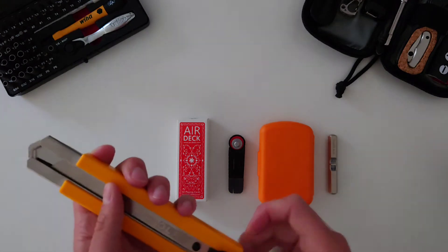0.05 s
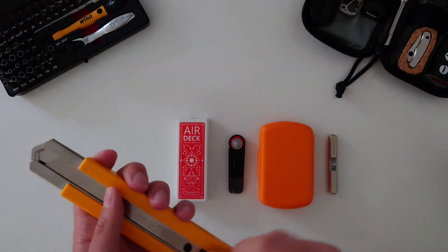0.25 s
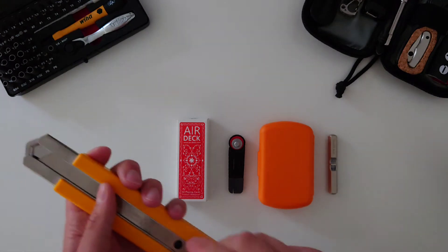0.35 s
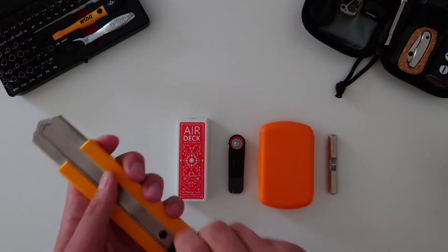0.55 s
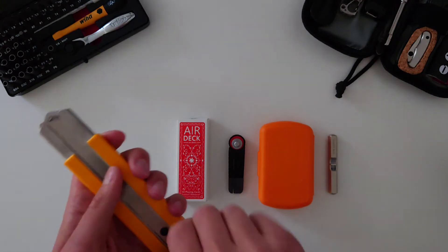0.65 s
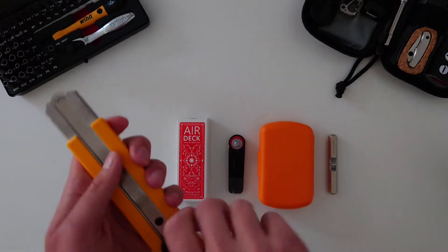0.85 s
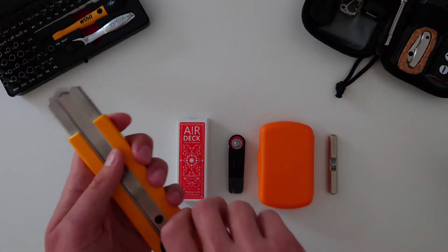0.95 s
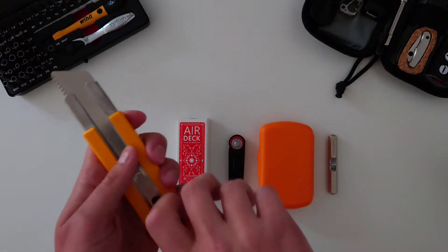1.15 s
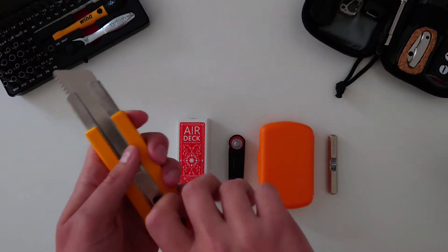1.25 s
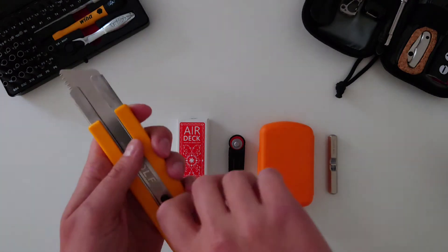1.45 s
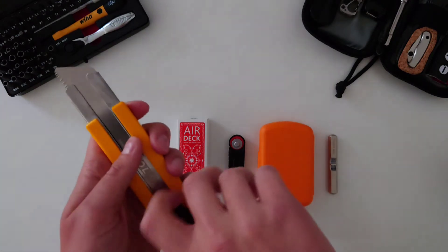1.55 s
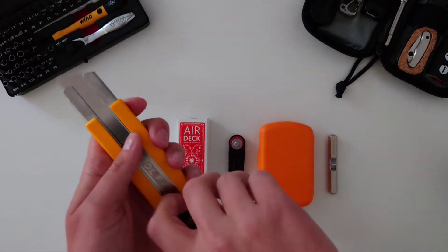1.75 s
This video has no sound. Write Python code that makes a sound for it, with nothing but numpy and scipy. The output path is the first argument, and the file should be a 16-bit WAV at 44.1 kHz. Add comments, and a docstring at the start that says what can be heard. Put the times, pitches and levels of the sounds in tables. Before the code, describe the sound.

Close by in a small room, a utility knife gives light steel taps and scrapes. Soft plastic rubbing follows, then a fast burst of ratchet clicks and a few last knocks, with low rumble and faint hiss underneath.

```python
"""Light steel taps and scrapes, close by in a small room: the loose blade of a snap-off utility knife
rattles in its metal channel as the knife is handled above a table. Then the plastic slider rubs and
knocks along the handle, and its spring ratchets over a quick run of notches.
Mains hum, a low rumble and faint hiss lie underneath."""
import sys
import numpy as np
from scipy import signal
from scipy.fft import rfft, irfft
from scipy.io import wavfile

SR = 44100
rng = np.random.default_rng(int(sys.argv[2]) if len(sys.argv) > 2 else 0)


def to_wav(sig):
    """Store sig (one row per channel, or 1-D mono) as 16-bit WAV at the path in sys.argv[1].

    Samples outside -1..1 are clipped; the rate is SR.
    """
    pcm = np.clip(np.atleast_2d(sig), -1, 1) * 32767
    pcm = np.round(pcm).astype(np.int16)
    wavfile.write(sys.argv[1], SR, pcm.T)  # frames by channels


N = 79380
T = np.arange(N) / SR

# broad tone of the steel blade and of the slider's spring: f/Hz, relative level/dB
BLADE_COLOUR = [(300, -38), (2000, -12.5), (3300, -1), (4600, -5.5), (5300, 2), (7500, -0.5),
                (10500, -15.5), (15500, -17)]
SPRING_COLOUR = [(500, -31.5), (1200, -26), (2300, 1.5), (2800, -1.5), (3300, -10), (7000, -10),
                 (15500, -34)]
# their resonances: f/Hz, height/dB
BLADE_MODES = [(1220, 8), (2090, 15), (3280, 6), (4430, 9), (5130, 11), (5325, 7), (5930, 9), (6910, 12),
               (8790, 16), (9980, 13), (11080, 9), (14100, 14)]
SPRING_MODES = [(2100, 6), (2484, 9), (2537, 9), (2760, 11), (5990, 5), (6910, 5)]
MODE_WIDTH_HZ = 55
# attack of a contact: share of energy in the first crack, build-up of the rattle/s
TAP_BITE, SNAP_BITE = (0.07, 0.00087), (0.2, 0.00016)
# grain of a friction: slips per second, spread of their sizes/dB, share of smooth hiss
BLADE_GRIT, SLIDER_GRIT = (1300, 2.6, 0.43), (3700, 2, 0.63)


def from_db(db):
    """Decibels to gain."""
    return 10 ** (np.asarray(db) / 20)


def unit(x):
    """Scale to rms 1."""
    return x / np.sqrt(np.mean(x ** 2) + 1e-20)


def at_hz(points, hz):
    """Read a curve on a log-frequency axis."""
    f, value = np.transpose(points)
    return np.interp(np.log(hz), np.log(f), value)


def body(x, colour, modes=()):
    """A resonant body as a unit-power filter: a broad colour with ringing modes on top."""
    size = 2 ** 17
    f = np.maximum(np.arange(size // 2 + 1) * SR / size, 1)
    peaks = 1 + sum(from_db(db) ** 2 / (1 + (2 * (f - hz) / MODE_WIDTH_HZ) ** 2) for hz, db in modes)
    magnitude = unit(from_db(at_hz(colour, f)) * np.sqrt(peaks))
    cepstrum = irfft(np.log(magnitude))
    causal = 1 + np.sign(size // 2 - np.arange(size))   # minimum phase: the ring follows the hit
    causal[0] = 1
    return irfft(rfft(x, size) * np.exp(rfft(cepstrum * causal)))[:N]


def friction(strokes, grit):
    """Tiny random slips over a hiss, juddering as the surfaces catch and let go."""
    rate, spread_db, hiss = grit
    judder_db, judder_per_s = 3, 170
    slips = (rng.random(N) < rate / SR) * rng.choice([-1, 1], N)
    slips = slips * from_db(spread_db * np.minimum(rng.exponential(1, N), 4))
    grain = np.sqrt(1 - hiss) * unit(slips) + np.sqrt(hiss) * rng.standard_normal(N)
    judder = np.interp(T * judder_per_s, np.arange(N), rng.standard_normal(N))
    envelope = sum(from_db(db) * np.interp(T, np.cumsum([s, rise, hold, fall]), [0, 1, 1, 0])
                   for s, rise, hold, fall, db in strokes)
    return grain * unit(from_db(judder_db * judder)) * envelope


def contacts(hits, bite):
    """Each contact is a crack followed by a few milliseconds of dense rattle."""
    crack_share, rise_s = bite
    out = np.zeros(N)
    for s, db, decay in hits:
        start = int(s * SR)
        rattle = rng.choice([-1, 1], N) * np.exp(-T / decay) * (1 - np.exp(-T / rise_s))
        hit = np.sqrt(1 - crack_share) * rattle / np.linalg.norm(rattle)
        hit[0] = np.sqrt(crack_share)
        out[start:] += from_db(db) * np.sqrt(decay * SR / 2) * hit[:N - start]
    return out


def blade():
    """Steel on steel: taps, light brushes and a hard shove ring the blade and its channel."""
    # light slides, then the hard push along the channel: t/s, rise/s, hold/s, release/s, level/dB
    brushes = [(-.01, .015, .028, 0.1, -57.5), (.122, 0.022, 0.042, 0.02, -54.5),
               (.192, 0.021, 0.023, 0.032, -44), (.328, 0.017, 0.094, 0.021, -48.5)]
    shoves = [(.426, 0.028, 0.013, 0.014, -28.5), (.472, 0.0036, 0.0067, 0.037, -35.5)]
    # blade taps: t/s, level/dB, decay/s, share that rings the channel, favoured f/Hz
    taps = [(.0098, -38.5, 0.0047, 0.7, 5200), (.177, -46, 0.0022, 0.3, 6000),
            (0.193, -43, 0.0017, 0.3, 6900), (0.2, -36, 0.0023, 0.85, 8800), (0.22, -47, 0.0023, .2, 3300),
            (0.238, -41, .003, 1, 5060), (.2475, -37.5, 0.0018, 0.4, 5150),
            (0.345, -27.5, 0.0033, 0.4, 11900), (.407, -33, 0.0017, 0.94, 6170),
            (0.4384, -27.5, 0.003, 0.87, 5100), (0.4813, -29, .0024, 0, 8800)]
    # the metal channel's broad tone and its resonances: f/Hz, relative level/dB
    channel_colour = [(300, -34.5), (900, -25.5), (1700, -28), (2400, -13.5), (3900, -14.5), (4800, -4.5),
                      (5300, 2.5), (7500, -3), (10500, -12), (15500, -12)]
    channel_modes = [(2510, 11), (2970, 7), (4400, 6), (5100, 6), (5230, 5), (6000, 5), (6300, 7),
                     (6515, 8), (8510, 10), (9870, 8)]
    on_blade, on_channel = friction(brushes, BLADE_GRIT), friction(shoves, BLADE_GRIT)
    for *tap, share, _ in taps:
        on_blade += np.sqrt(1 - share) * contacts([tap], TAP_BITE)
        on_channel += np.sqrt(share) * contacts([tap], TAP_BITE)
    rings = sum(blade_ring(s, db, hz) for s, db, _, _, hz in taps)
    pressed_modes = [(hz, db - 3) for hz, db in BLADE_MODES]   # steel pressed on steel rings less
    steel = body(on_blade, BLADE_COLOUR, pressed_modes) + body(on_channel, channel_colour, channel_modes)
    return steel + rings + blade_ping(taps[0][0])


def blade_ring(s, tap_db, favoured_hz):
    """A tap's clear ring: the point of contact favours the blade's modes near one pitch."""
    focus_db, focus_octaves = 12.5, 0.42
    ring_db, rise_s = 2.5, 0.0023
    hz, height = np.transpose(BLADE_MODES)
    focus = focus_db * np.exp(-(np.log2(hz / favoured_hz) / focus_octaves) ** 2)
    gains = from_db(height + at_hz(BLADE_COLOUR, hz) + focus)
    age = T[:N // 10]
    partials = np.sin(2 * np.pi * (np.outer(hz, age) + rng.random((len(hz), 1))))
    envelope = np.exp(-np.pi * MODE_WIDTH_HZ * age) * (1 - np.exp(-age / rise_s))
    ring = from_db(tap_db + ring_db) * envelope * (gains @ partials) / np.linalg.norm(gains)
    return np.pad(ring, (int(s * SR), N))[:N]


def blade_ping(s, hz=11760, db=-70, t60_s=0.31):
    """The thin, high ring that the first tap leaves hanging."""
    age = np.maximum(T - s, 0)
    return from_db(db) * np.exp(-np.log(1000) * age / t60_s) * np.sin(2 * np.pi * hz * age)


def slider():
    """The slider knocks and rubs in the handle, each rub singing its own pitch; the spring rings along."""
    # rubs: t/s, rise/s, hold/s, release/s, level/dB, share that rings the spring, singing f/Hz, height/dB
    rubs = [(0.502, 0.018, 0.036, 0.16, -62.5, 0, 2280, 11),
            (0.691, 0.023, 0.029, 0.027, -51, 0, 1290, 15.5),
            (0.733, 0.013, 0.018, 0.026, -61.5, 0, 1835, 22),
            (0.849, 0.0045, 0.0023, 0.017, -61.5, 0.13, 1380, 21),
            (0.978, .042, 0.023, 0.026, -48, 0.13, 1270, 14.5),
            (1.041, 0.023, 0.024, 0.027, -52.5, 0.32, 1850, 23.5),
            (1.456, 0.014, 0.042, 0.055, -44.5, 0.04, 985, 9.5),
            (1.533, .02, 0.055, 0.043, -57, 0.24, 2225, 23.5),
            (1.747, 0.01, 0.069, .017, -58.5, 0.6, 1260, 21)]
    # knocks on the plastic: t/s, level/dB, decay/s
    knocks = [(.759, -43, 0.0013), (.852, -58.5, 0.0042), (.965, -56, 0.0023), (1.2605, -37.5, 0.0047),
              (1.424, -57.5, 0.013), (1.4495, -44.5, 0.0057), (1.454, -38.5, 0.0012)]
    # the plastic handle's broad tone and its resonances: f/Hz, relative level/dB
    handle_colour = [(300, -46.5), (700, -14), (1600, -7.5), (2000, -1), (3100, -3.5), (4600, -5.5),
                     (6300, -2), (9000, -5), (10500, -14), (15500, -18)]
    handle_modes = [(1850, 9), (2140, 11), (2500, 4), (2750, 6), (3700, 5), (5340, 8), (6500, 6)]
    handle = body(contacts(knocks, SNAP_BITE), handle_colour, handle_modes)
    on_spring = np.zeros(N)
    for *stroke, share, sing_hz, sing_db in rubs:
        rub = body(friction([stroke], SLIDER_GRIT), handle_colour, handle_modes + [(sing_hz, sing_db)])
        handle += np.sqrt(1 - share) * rub
        on_spring += np.sqrt(share) * friction([stroke], SLIDER_GRIT)
    return handle + body(on_spring, SPRING_COLOUR, SPRING_MODES)


def ratchet(snap_db=-27.5, decay_s=0.0025, echo_s=0.0038, echo_db=-3):
    """The spring chatters from notch to notch; a strong table echo doubles each click about 4 ms later."""
    # snaps into the notches: t/s
    notches = [1.1204, 1.135, 1.1447, 1.1557, 1.167, 1.178, 1.189, 1.1977, 1.2079, 1.2196, 1.235, 1.257]
    # tone of a snap: f/Hz, relative level/dB
    notch_colour = [(300, -54.5), (1200, -10), (1600, -20), (2500, 1), (3300, -11.5), (4500, -6),
                    (5300, -1), (8000, 4.5), (9700, -2.5), (10700, -8), (13000, -4.5), (15500, -13.5)]
    # the spring's drag over the run: t/s, rise/s, hold/s, release/s, level/dB
    drags = [(1.12, 0.032, 0.059, 0.08, -38.5)]
    rush = np.exp(-((np.array(notches) - 1.183) / 0.019) ** 2)
    levels_db = snap_db - 4.5 * rush   # mid-run the slider is fastest and the spring seats less deeply
    levels_db[-1] += 0.5   # it seats harder in the last notch
    snaps = sum(contacts([(s, db, decay_s), (s + echo_s, db + echo_db, decay_s)], SNAP_BITE)
                for s, db in zip(notches, levels_db))
    chatter = body(friction(drags, SLIDER_GRIT), SPRING_COLOUR, SPRING_MODES)
    return body(snaps, notch_colour) + chatter


def room(x, wet_db, predelay_s=0.0064, table_echo_s=0.0036, table_echo_db=-11):
    """A reflection from the table top, then a diffuse tail whose treble dies first."""
    # the room's reverb time: f/Hz, T60/s
    t60 = [(500, 0.35), (2500, 0.37), (6000, 0.37), (15000, 0.26)]
    edges = np.geomspace(200, 18000, 10)
    white, tail = rng.standard_normal((2, N)), np.zeros(N)
    for k, (low, high) in enumerate(zip(edges, edges[1:])):
        band = signal.sosfilt(signal.butter(2, [low, high], "band", fs=SR, output="sos"), white[k % 2])
        tail += band * np.exp(-np.log(1000) * T / at_hz(t60, np.sqrt(low * high)))
    response = from_db(wet_db) * unit(tail * (T > predelay_s)) / np.sqrt(N)
    response[0] += 1
    response[int(table_echo_s * SR)] += from_db(table_echo_db)
    return signal.fftconvolve(x, response / np.linalg.norm(response))[:N]


def background(hiss_db=-67.5):
    """The bed under the knife: mains hum, a swelling low rumble and faint hiss."""
    # hum tones: f/Hz, level/dB
    hum_tones = [(100, -68.5), (148, -81), (198, -77)]
    # the rumble's swells: t/s, level/dB
    swells = [(0, -56.5), (.55, -60), (.66, -48), (.97, -45), (1.5, -49.5), (1.62, -60.5), (1.74, -48),
              (1.79, -53.5)]
    # tone of the rumble and of the hiss: f/Hz, relative level/dB
    rumble_colour = [(5, -12), (15, -3.5), (27, -2), (33, -18.5), (49, -23.5), (58, -25), (130, -70.5),
                     (400, -67.5)]
    hiss_colour = [(30, 8.5), (120, -6.5), (300, -3), (600, -10), (1500, -11), (9000, -24), (15500, -24)]
    hum = sum(np.sqrt(2) * from_db(db) * np.sin(2 * np.pi * (hz * T + rng.random()))
              for hz, db in hum_tones)
    swell = from_db(np.interp(T, *np.transpose(swells)))
    rumble = swell * unit(body(rng.standard_normal(N), rumble_colour))
    hiss = from_db(hiss_db) * unit(body(rng.standard_normal(N), hiss_colour))
    return hum + rumble + hiss


def scene():
    """The knife in the room, in mono, with the ratchet a little drier than the rest."""
    knife = room(blade() + slider(), wet_db=-6) + room(ratchet(), wet_db=-7.5)
    return (knife + background())[None]


def record(dry):
    """A steep low-pass takes off the very top."""
    cutoff_hz = 15550
    return signal.sosfilt(signal.ellip(12, .1, 70, cutoff_hz, fs=SR, output="sos"), dry)


dry = scene()
out = record(dry)
to_wav(out)
```